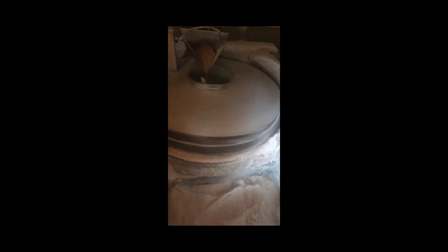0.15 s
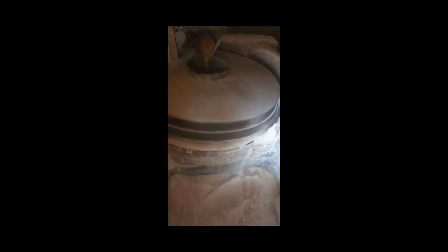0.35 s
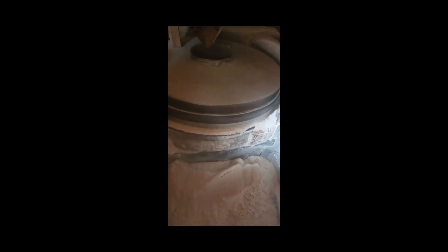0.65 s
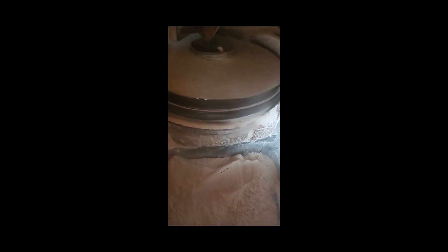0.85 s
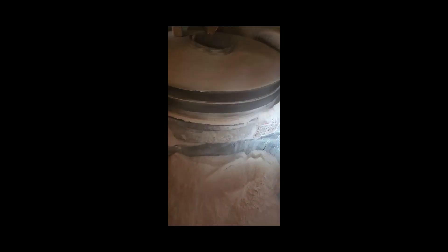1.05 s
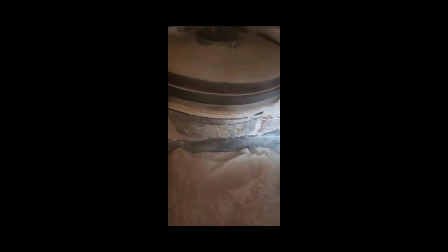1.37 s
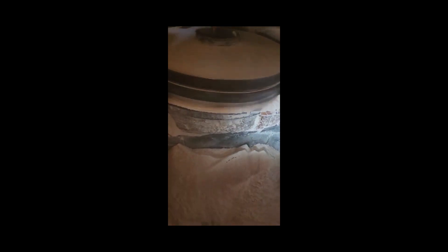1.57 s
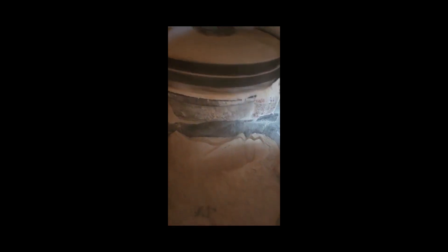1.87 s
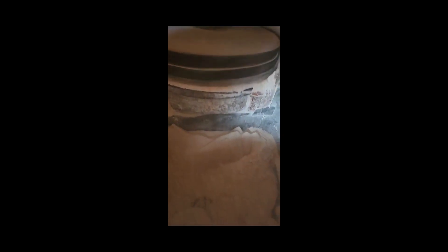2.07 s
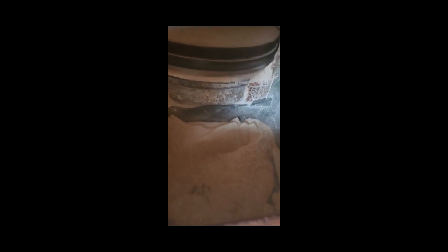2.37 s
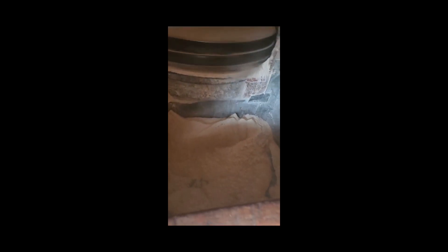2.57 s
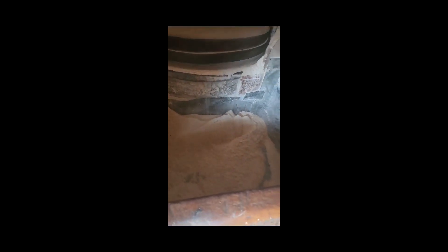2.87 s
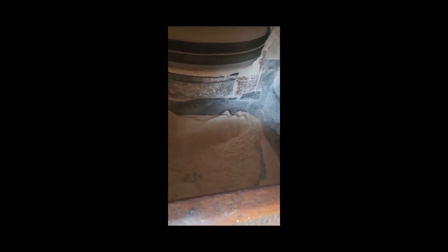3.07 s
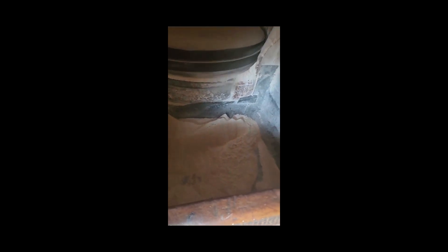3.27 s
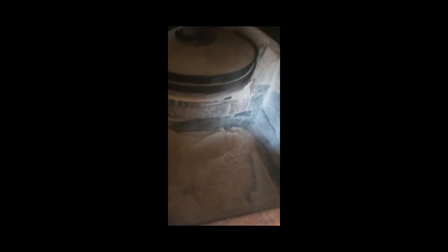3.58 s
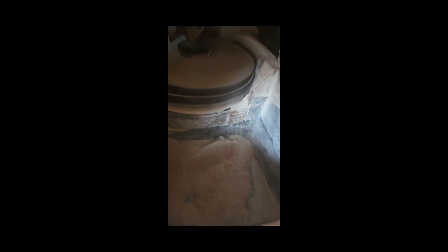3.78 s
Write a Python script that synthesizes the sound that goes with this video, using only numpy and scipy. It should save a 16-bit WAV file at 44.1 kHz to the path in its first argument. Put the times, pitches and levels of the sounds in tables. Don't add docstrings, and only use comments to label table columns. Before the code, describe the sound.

A turning millstone rumbles low and unevenly throughout, thudding as it lurches; irregular wooden knocks and short grain rattles come over it, with faint iron jingles and water hiss, close in stereo in a small stone room.

```python
import sys
import numpy as np
from scipy import signal
from scipy.fft import rfft, irfft
from scipy.io import wavfile
from scipy.ndimage import uniform_filter1d

SR = 44100
rng = np.random.default_rng(int(sys.argv[2]) if len(sys.argv) > 2 else 0)


def volts(x):
    e = np.asarray(x, float) / 20
    return 10 ** e


def output_pcm(signal):
    pcm = np.clip(np.atleast_2d(signal).T, -1, 1) * 32767
    wavfile.write(sys.argv[1], SR, np.round(pcm).astype(np.int16))


N = 173313

# t/s, peak level/dB, rattle length/s, extra level of the low part/dB
SHAKES = [(0.01, -49.5, 0.014, 15), (0.17, -34.5, 0.018, 5), (0.235, -41.5, 0.014, 9),
          (0.303, -36, 0.0091, 0.5), (0.454, -49.5, 0.044, 8), (0.644, -52, 0.026, 9),
          (0.695, -48, 0.03, 6.5), (0.788, -47, 0.0092, 9), (0.96, -48, 0.0065, 9),
          (1.0874, -35.5, 0.0075, 0), (1.311, -29.5, 0.024, -3), (1.342, -42, 0.0066, -1),
          (1.4925, -35, 0.032, 5.5), (1.7687, -37.5, 0.024, 5), (1.889, -37.5, 0.016, 1),
          (2.08, -37, 0.026, -4), (2.265, -45, 0.055, 11), (2.565, -36, 0.016, -10.5),
          (2.616, -47, 0.015, -8), (2.683, -45, 0.013, -3), (2.9, -40, 0.022, 4), (3.095, -36, 0.018, -1),
          (3.3626, -38.5, 0.041, 1), (3.494, -35, 0.0083, -3), (3.689, -42.5, 0.038, 6.5),
          (3.904, -43, 0.034, 11.5)]


def frame(load_db, floor_db, beam_db):
    # f/Hz, width/Hz, level/dB
    frame_modes = [(112.2, 11.1, -1), (123, 26, -10), (191.1, 47, -9.5), (210.3, 19, -4), (235.5, 17, -3),
                   (259.3, 18.2, 3.5), (287.9, 16.2, 0), (302, 29, -13), (388, 21.5, -12),
                   (428.2, 29.6, -12), (495, 46, -14.5), (535.7, 19, -15), (591, 12, -22), (890, 89, -23)]
    wander_db, bed_db, trim_db = 2.5, -5.5, 1
    source = grit(per_s=900, spread_db=3.5)
    modes = []
    for k, (hz, width, level_db) in enumerate(frame_modes):
        r = np.exp(-np.pi * width / SR)
        resonance = [1, -2 * r * np.cos(2 * np.pi * hz / SR), r * r]
        pair = source[k % 2::2]
        for _ in range(2):
            pair = signal.lfilter([1 - r, 0, r - 1], resonance, pair)
        modes.append(volts(level_db + wander_db * drift(4.9)) * stereo(*pair, hz))
    upper_db = -47 + 0.21 * (load_db - load_db.mean())
    parts = [(modes[:2], floor_db),
             (modes[2:4], beam_db + bed_db / 2),
             (modes[4:8], load_db + bed_db),
             (modes[8:], upper_db)]
    return sum(even(sum(part)) * volts(level_db + trim_db) for part, level_db in parts)


def thuds():
    # t/s, peak level/dB, f/Hz
    lurches = [(0.169, -20, 254.3), (0.234, -24, 239.8), (0.277, -22.5, 252.4), (0.473, -28, 262.2),
               (0.509, -24.5, 258), (0.585, -27.5, 239), (0.659, -30, 282), (0.802, -31, 275.7),
               (0.84, -24.5, 260.6), (0.982, -23.5, 248.7), (1.037, -23.5, 279.7), (1.183, -29.5, 224),
               (1.274, -26, 241.4), (1.362, -39, 256), (1.454, -28.5, 281), (1.553, -29, 265),
               (1.587, -26.5, 235), (1.654, -27, 289.3), (1.706, -24, 190), (1.762, -24, 250.2),
               (1.873, -26, 257.4), (1.914, -31.5, 209.7), (1.964, -29.5, 247), (2.022, -27.5, 203.6),
               (2.087, -25.5, 248.7), (2.384, -27, 237), (2.444, -24.5, 272.8), (2.645, -28, 245.3),
               (2.691, -36, 235), (2.744, -34, 251.5), (2.787, -25, 233.7), (2.849, -26, 204.5),
               (2.938, -31, 266), (2.986, -29.5, 260), (3.025, -28.5, 230), (3.092, -27, 254),
               (3.148, -46, 252), (3.193, -26.5, 271.7), (3.248, -21.5, 264.4), (3.362, -20.5, 208),
               (3.463, -22, 230.7), (3.521, -34.5, 270), (3.602, -26, 220), (3.69, -24, 255.7),
               (3.75, -28.5, 263), (3.848, -29.5, 293.8)]
    # t/s, peak level/dB, f/Hz
    clops = [(0.174, -27, 487), (0.303, -33.5, 546), (0.696, -36, 421), (0.914, -31.5, 491),
             (1.311, -36.5, 503), (2.089, -37, 467), (2.939, -40, 490), (3.097, -35, 495),
             (3.182, -34.5, 498), (3.471, -38, 349), (3.856, -36, 406)]
    lead = [0.00405, 0, 0]
    low = swells(np.array(lurches) - lead, rise_s=0.0066, t60=0.2)
    upper = swells(np.array(clops) - lead, rise_s=0.0033, t60=0.13)
    return volts(-3) * (low + upper)


def grind(load_db):
    # f/Hz, level/dB per Hz
    grind_spectrum = [(22, -36), (40, -28), (65, -18), (150, -22), (256, -5.5), (345, -17.5), (661, -19),
                      (2400, -34)]
    shared = drift(9.1)
    swing_db = -41.5 + 0.21 * (load_db - load_db.mean())
    return bank(grit(3000, 3.0), grind_spectrum, lambda hz: volts(swing_db + shared + drift(8)))


def rattle():
    # f/Hz, level/dB per Hz
    rattle_spectrum = [(900, 3.5), (1590, -6), (3000, -7), (4070, -10), (5200, -7.5), (9500, -10),
                       (12500, -5.5), (19000, -8.5)]
    low_part_hz, colour_db, patchy_db, trim_db = 3880, 0.36, 3, -10
    fade_t60, tail_t60, first_t60 = 0.06, 0.21, 3 * 0.0072
    tail, first_hit = volts(-4), volts(0.5)
    s, db, hold, low_db = np.transpose(SHAKES)
    shaking = drift(160)

    def shape(hz):
        tilt_db = low_db / (1 + (hz / low_part_hz) ** 4)
        heights = volts(db + trim_db + tilt_db + colour_db * rng.standard_normal(len(s)))
        starts = spikes(s, heights)
        ends = spikes(s + hold, heights)
        held = np.cumsum(starts - ends)
        body = held + (1 - tail) * fade(ends, fade_t60) + tail * fade(ends, tail_t60)
        first = first_hit / (1 + (low_part_hz / hz) ** 4) * fade(starts, first_t60)
        return body * volts(0.9 * shaking + patchy_db * drift(34)) + first * [[1], [0.24]]

    return bank(grit(7000, 3.4), rattle_spectrum, shape) * volts([[-0.5], [0.5]])


def notes():
    # t/s, peak level/dB, f/Hz
    clear_notes = [(.175, -36, 2410), (.176, -46, 3340), (.2375, -54, 5170), (.304, -53, 6500),
                   (.32, -51, 3340), (.953, -49.5, 3100), (1.098, -47, 3410), (1.287, -58, 3560),
                   (1.312, -40.5, 7800), (1.346, -47, 5940), (1.494, -43.5, 2860), (1.494, -49, 7130),
                   (1.522, -45, 2050), (1.769, -50, 3080), (1.894, -49, 5800), (2.567, -42, 4900),
                   (2.62, -57, 6600), (2.906, -46, 5000), (3.1, -43, 3400), (3.362, -40, 4880)]
    flutter = 0.6 + drift(220)
    return swells(clear_notes, rise_s=0.001, t60=0.073) * flutter * volts([[0], [-3.0]])


def knocks():
    # t/s, peak level/dB, brightness/dB per octave
    strokes = [(0.172, -28, -1), (0.233, -34, 0), (0.303, -33, 0), (0.697, -33, -17), (1.054, -34, -9),
               (1.099, -28, -7), (1.309, -31, 3), (1.4935, -29, -2), (1.768, -37, 7), (2.569, -39, 9),
               (3.375, -32.5, -5), (3.906, -36, 9.5)]
    # f/Hz, level/dB, t60/s
    wood = [(248, -3, 0.025), (384.6, -1, 0.29), (493.3, 1.5, 0.1), (595, -1.5, 0.11), (763, 0, 0.052),
            (895, -4.5, 0.061), (1180, -9.5, 0.031)]
    s, db, bright_db = np.transpose(strokes)
    return struck(s, lambda hz: db - 7 + bright_db * np.log2(hz / 500), wood, bounce_s=0.009, scatter_db=2.0)


def shoe():
    # f/Hz, level/dB, t60/s
    boards = [(2344, -9.5, 0.015), (3297, -4.5, 0.051), (4950, -7, 0.026), (6840, -9, 0.041)]
    s, db, _, low_db = np.transpose(SHAKES)
    return struck(s, lambda hz: db - 14.5 + low_db, boards, bounce_s=0.01, scatter_db=5.5, count=6)


def iron():
    # t/s, peak level/dB
    jingles = [(0.02, -56), (.18, -39), (.25, -56), (0.312, -51), (.40, -54.5), (.46, -51), (.50, -56),
               (0.649, -50), (.695, -50), (0.8, -54), (0.964, -51), (1.10, -52), (1.185, -60), (1.559, -53),
               (1.59, -61), (1.787, -45), (2.05, -52), (2.569, -48), (2.884, -54), (2.947, -49),
               (3.102, -50), (3.20, -62), (3.371, -49), (3.67, -45)]
    # f/Hz, level/dB, t60/s
    iron_modes = [(11355, -5, .09), (11400, -4, .1), (11470, -8, .06), (9835, -14, .08), (3090, -11, .1)]
    s, db = np.transpose(jingles)
    return struck(s, lambda hz: db - 5.5, iron_modes, bounce_s=0.03, scatter_db=3.5)


def water():
    # f/Hz, level/dB per Hz
    race_spectrum = [(1000, 12.5), (1500, -15), (2540, 1), (5280, -5), (7170, -6), (8600, -17.5),
                     (12900, -11), (19000, -43)]
    shared = drift(14.0)
    hiss = rng.standard_normal((4, N))
    return volts(-54.5) * bank(hiss, race_spectrum, lambda hz: volts(0.37 * shared + 1.03 * drift(13)))


def rms_one(x):
    return x / np.sqrt(np.mean(x ** 2) + 1e-20)


def even(x):
    size = int(0.21 * SR)
    slow = uniform_filter1d(uniform_filter1d(np.mean(x ** 2, axis=0), size), size)
    return rms_one(x / np.sqrt(slow + 1e-20))


def at_hz(points, hz):
    points = np.array(points)
    return np.interp(np.log(hz), np.log(points[:, 0]), points[:, 1])


def drift(rate):
    step = 40
    r = np.exp(-2 * np.pi * rate * step / SR)
    noise = rng.standard_normal(N // step + 2002)
    slow = signal.lfilter([1], [1, -2 * r, r * r], noise)[2000:]
    return np.interp(np.arange(N) / step, np.arange(len(slow)), rms_one(slow))


def grit(per_s, spread_db):
    sizes = volts(spread_db * np.minimum(rng.exponential(1, (4, N)), 5))
    signs = rng.choice([-1, 1], (4, N))
    return rms_one(sizes * signs * (rng.random((4, N)) < per_s / SR))


def spikes(s, heights):
    out = np.zeros(N + SR)
    np.add.at(out, (s * SR).astype(int), heights)
    return out[:N] + 1e-18


def fade(strokes, t60):
    return signal.lfilter([1], [1, -volts(-60 / (t60 * SR))], strokes)


def ring(strokes, hz, t60):
    r = volts(-60 / (t60 * SR))
    w = 2 * np.pi * hz / SR
    return signal.lfilter([0, np.sin(w)], [1, -2 * r * np.cos(w), r * r], strokes)


def struck(s, level_of, modes, bounce_s, scatter_db, count=3):
    out = np.zeros((2, N))
    later = np.arange(count)
    lands = s[:, None] + bounce_s * later * rng.uniform(0.69, 1.25, (len(s), count))
    for hz, level_db, t60 in modes:
        scatter, *signs = rng.standard_normal((3,) + lands.shape)
        strength_db = level_of(hz)[:, None] + level_db - 3 * later
        strength = volts(strength_db + scatter_db * scatter * (later > 0))
        mid, side = (ring(spikes(lands.ravel(), (strength * np.sign(c)).ravel()), hz, t60) for c in signs)
        out += stereo(mid, side, hz)
    return out


def swells(rows, rise_s, t60):
    out = np.zeros(N + SR)
    t = np.arange(SR // 4) / SR
    shape = (1 - np.exp(-t / rise_s)) * volts(-60 * t / t60)
    shape /= shape.max()
    for s, db, hz in rows:
        start = int(s * SR)
        out[start:start + len(t)] += volts(db) * shape * np.sin(2 * np.pi * (hz * t + rng.random()))
    return out[:N]


def stereo(mid, side, hz):
    # f/Hz, correlation
    likeness = [(60, 1), (180, 0.95), (550, 0.85), (1650, 0.22), (4970, -0.085), (15000, -0.14)]
    alike = np.clip(at_hz(likeness, hz), -1, 1)
    return (np.sqrt(1 + alike) * mid + np.sqrt(1 - alike) * side * [[1], [-1]]) / np.sqrt(2)


def bank(source, spectrum, gain):
    bottom, top = spectrum[0][0], spectrum[-1][0]
    edges = np.geomspace(bottom, top, int(3 * np.log2(top / bottom)) + 1)
    out, power = 0, 0
    for k, (low, high) in enumerate(zip(edges, edges[1:])):
        band = signal.butter(2, [low, high], "band", fs=SR, output="sos")
        mid, side = signal.sosfilt(band, source[k % 2::2])
        hz = np.sqrt(low * high)
        height = volts(at_hz(spectrum, hz))
        power += height ** 2 * (high - low) * 2 / SR
        out = out + height * gain(hz) * stereo(mid, side, hz)
    return out / np.sqrt(power)


def scene():
    # t/s, frame level/dB, floor level/dB, low beam level/dB
    pressure = [(0, -24, -37, -35), (0.198, -33.5, -46.5, -36.5), (.62, -38, -50.5, -44),
                (.76, -34, -48.5, -41.5), (1.04, -34.5, -45.5, -40), (1.2, -36.5, -37.5, -37.5),
                (1.42, -35, -54, -41.5), (1.6, -32, -38, -40.5), (1.8, -34.5, -51, -39.5),
                (2.05, -35, -44.5, -38.5), (2.27, -37.5, -51, -47), (2.47, -31, -43, -35),
                (2.65, -38.5, -45, -37), (2.83, -36.5, -44.5, -39.5), (3.1, -33.5, -45, -39),
                (3.33, -30.5, -44, -34.5), (3.6, -39.5, -46, -39.5), (3.93, -34.5, -52.5, -39.5)]
    s, *columns = np.transpose(pressure)
    load_db, floor_db, beam_db = (np.interp(np.arange(N) / SR, s, c) for c in columns)
    mix = frame(load_db, floor_db, beam_db) + thuds() + grind(load_db) + notes() + iron() + water()
    low_cut = signal.butter(2, 210, "high", fs=SR, output="sos")
    mix += signal.sosfilt(low_cut, rattle() + knocks() + shoe())
    return np.array([mix[0], np.roll(mix[1], 13)])


def band_limit(x):
    return signal.sosfilt(signal.butter(12, 17000, fs=SR, output="sos"), x)


def record(dry):
    # f/Hz, left over right level/dB
    ports = [(125, -0.1), (500, 1.5), (2300, 0), (4000, 2), (6500, 8), (7900, 1.5), (12500, 7), (15700, 6)]
    hz = np.arange(N // 2 + 1) * SR / N + 1
    top_cut_db = np.interp(hz, [15750, 1.01 * 15750, 15960, 1.02 * 15960], [0, -32, -32, -64])
    colour_db = at_hz(ports, hz) * np.array([[0.5], [-0.5]]) + top_cut_db
    peak_hz, peak_width_hz, peak_db = 11270, 590, 9.5
    colour_db[1] += peak_db / (1 + ((hz - peak_hz) / peak_width_hz) ** 2)
    return band_limit(irfft(rfft(dry) * volts(colour_db), N))


dry = scene()
out = record(dry)
output_pcm(out)
```